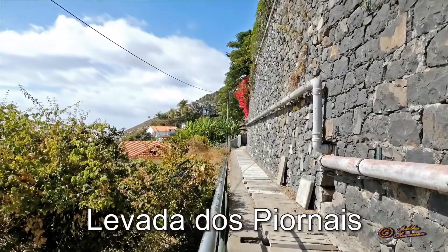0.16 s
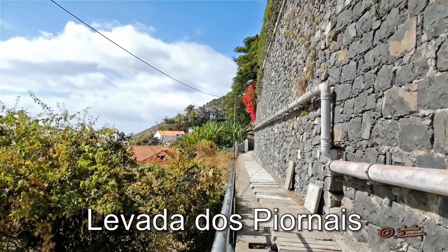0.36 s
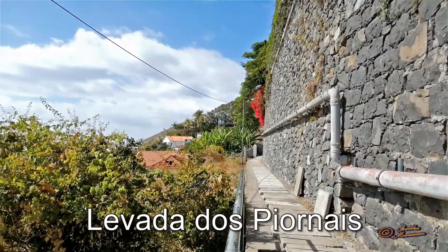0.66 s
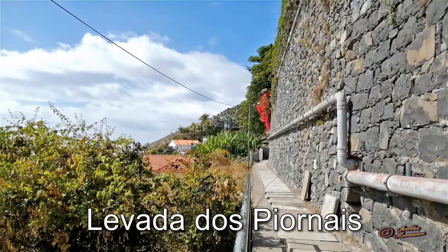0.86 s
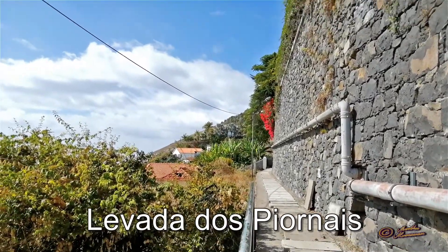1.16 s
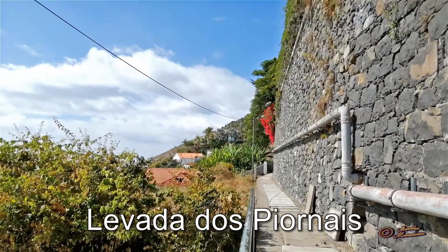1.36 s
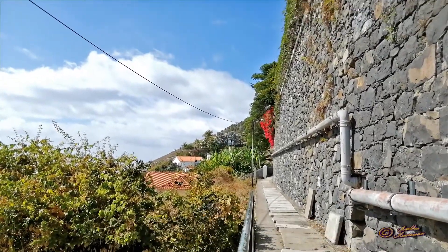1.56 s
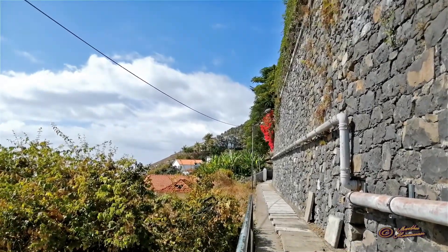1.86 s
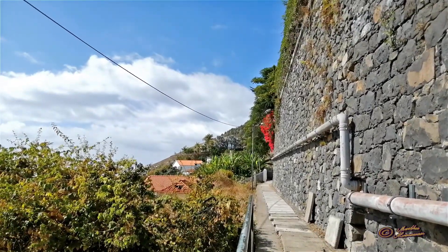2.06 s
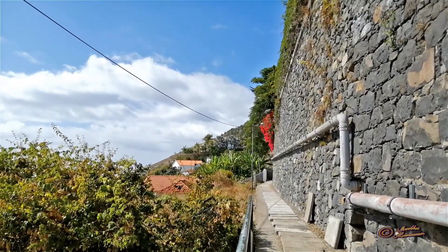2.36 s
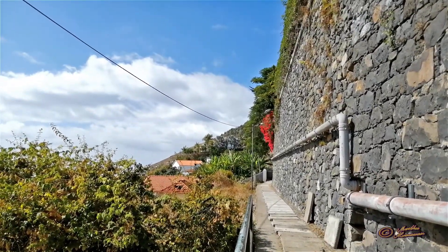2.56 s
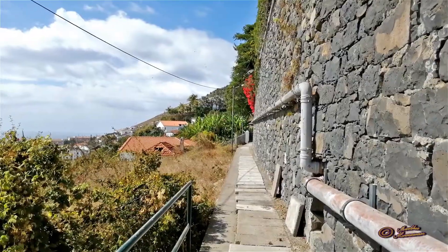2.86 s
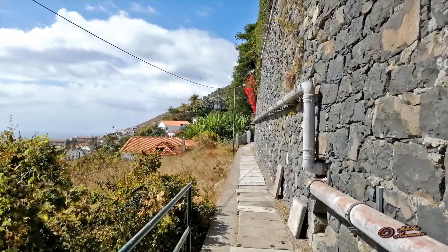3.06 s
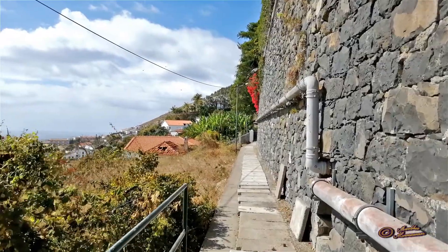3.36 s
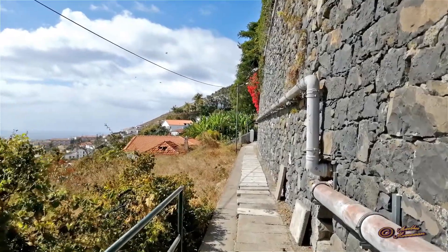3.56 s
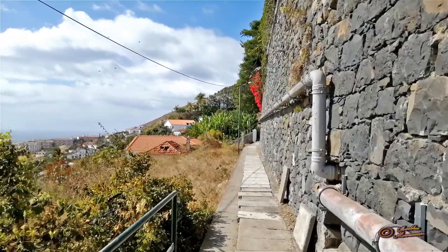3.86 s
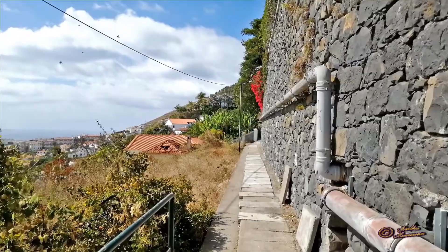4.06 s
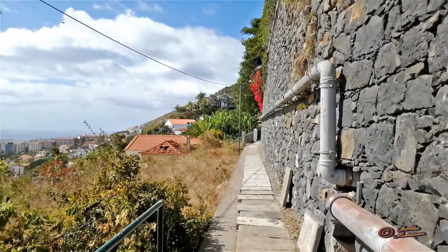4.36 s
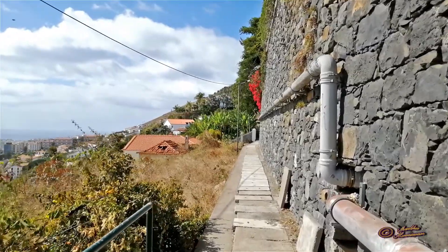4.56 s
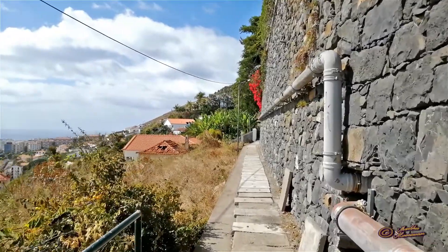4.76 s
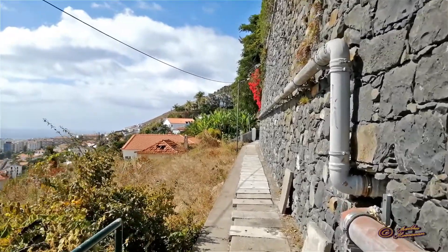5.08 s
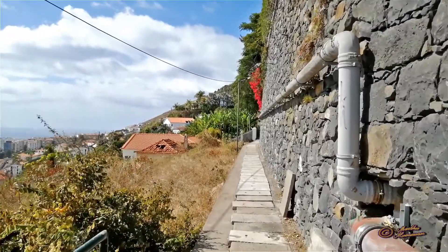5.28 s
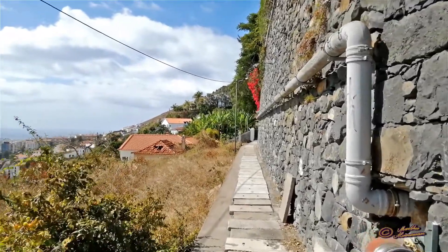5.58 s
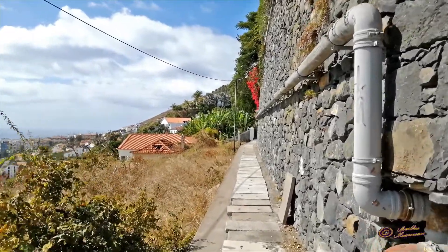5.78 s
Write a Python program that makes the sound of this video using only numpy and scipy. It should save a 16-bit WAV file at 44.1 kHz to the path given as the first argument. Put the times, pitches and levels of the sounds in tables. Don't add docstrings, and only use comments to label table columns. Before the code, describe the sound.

Water gurgles and bubbles along a narrow stone channel outdoors while gusty wind thuds and rumbles irregularly against a small handheld microphone.

```python
import sys
import numpy as np
from scipy import signal
from scipy.fft import rfft, irfft, next_fast_len
from scipy.io import wavfile
from scipy.ndimage import uniform_filter1d

SR = 44100
rng = np.random.default_rng(int(sys.argv[2]) if len(sys.argv) > 2 else 0)


def attenuation_scalar(level_db):
    decades = np.asarray(level_db, float) / 20
    return 10 ** decades


def wav_out(sig):
    wavfile.write(sys.argv[1], SR, np.round(np.clip(np.atleast_2d(sig).T, -1, 1) * 32767).astype(np.int16))


N = 261064

AIR_DB = -85.5
WASH_DB, WASH_PER_CHURN, WASH_PER_PUSH, WASH_PER_FACING = -54, 0.91, 0.62, 1
# (frequency [Hz], density [dB per Hz])
WASH_SPECTRUM = [(420, -15), (483, -27), (663, 0.5), (1030, -3.5), (1620, -15), (2340, -17.5), (4500, -37),
                 (5850, -56), (9900, -120)]
# (frequency [Hz], density [dB per Hz])
SPRAY_SPECTRUM = [(2500, -11), (3500, -4.5), (4800, -1), (6000, -9), (7000, -3.5), (8800, -6.5),
                  (10200, -45), (12000, -21.5), (15600, -22)]
# (frequency [Hz], level [dB])
FIZZ_SPECTRUM = [(500, 3.5), (1000, 1.5), (2500, 7), (4600, -1.5), (6000, -5), (8000, 0), (10000, -23)]
# (resonance [Hz], width [Hz], level [dB])
CHANNEL_MODES = [
    (880, 170, -14.5),
    (1500, 810, -4.5),
    (2470, 180, -14),
    (3250, 54, -19),
    (4820, 740, -4),
]

# (start [s], hold [s], level [dB], upper band over it [dB])
RUSH_SPELLS = [(0.0, 0.14, -53, -10), (.59, 0.16, -51, -11), (.86, 0.1, -53.5, -22), (1.02, 0.14, -48, -6),
               (1.35, 0.12, -49.5, -12), (2.12, 0.17, -52, -17), (2.42, 0.26, -59, 1.5),
               (2.99, 0.15, -53.5, -2.5), (3.2, .17, -55.5, -21), (3.5, 0.14, -63, -13),
               (4.06, 0.323, -51.5, -8), (4.57, 0.081, -58.5, -27), (4.97, 0.15, -53, -22),
               (5.15, .13, -59, -2), (5.44, 0.18, -57.5, -17)]
RUSH_RISE_DB_PER_S, RUSH_FALL_DB_PER_S = 348, 350

# (start [s], hold [s], push level [dB], thud over push [dB])
WIND_GUSTS = [(0.0, 0.061, -22.5, -4), (0.36, 0.05, -19.5, -36), (0.55, 0.089, -21.5, -18),
              (0.82, 0.17, -15.5, -23.5), (1.03, 0.072, -14, -18), (1.24, 0.025, -22, -20),
              (1.36, 0.095, -19, -10), (1.55, 0.23, -26.5, -20.5), (1.85, 0.16, -20.5, -7),
              (2.1, 0.11, -8, -15.5), (2.3, 0.11, -14.5, -12), (2.5, 0.15, -23, -7.5),
              (2.88, 0.15, -28, -12.5), (3.09, 0.015, -19.5, -28), (3.24, 0.01, -20, -4.5),
              (3.47, 0.019, -28.5, -33), (3.56, 0.17, -25, -10), (3.8, 0.0083, -18.5, -19.5),
              (3.92, 0.024, -25.5, -7), (4.05, 0.054, -12.5, -4), (4.18, 0.039, -2, -14.5),
              (4.27, 0.08, -24.5, -4), (4.57, 0.017, -23.5, -6.5), (4.68, 0.14, -33, -2),
              (4.96, 0.031, -21.5, -10.5), (5.1, 0.13, -24.5, -15.5), (5.38, 0.055, -23.5, -17),
              (5.55, 0.041, -24.5, -13.5), (5.72, 0.21, -39, -10)]
GUST_RISE_DB_PER_S, GUST_FALL_DB_PER_S, LULL_DB, LULL_THUD_DB = 203.5, 178, -38, -51.5
FLUTTER_DB, FLUTTER_PER_PUSH, FLUTTER_PER_THUD, FLUTTER_PER_CHURN = -45, 0.56, 0.094, 0.41
# (time [s], level [dB])
MIC_FACING = [(0.0, 8.5), (0.15, 8.5), (0.4, -1), (0.7, 1.5), (1.1, -1.5), (1.5, 0.5), (1.85, -4),
              (2.3, -2.5), (2.65, 5.5), (3.0, -6.5), (3.35, 10), (3.55, -7), (4.1, -3.5), (4.4, 1.5),
              (4.7, 4), (5.05, -7), (5.5, 2), (5.92, -3)]
# (time [s], peak [dB], pitch [Hz])
HOUSING_KNOCKS = [
    (1.899, -32, 154),
    (2.005, -20.5, 141),
    (3.243, -29.5, 160),
    (4.357, -16, 169.6),
    (4.564, -17, 158),
    (4.923, -22, 52.7),
]

# (start [s], hold [s], churn level [dB], spray over churn [dB])
STREAM_SURGES = [(0.0, 0.16, -52.5, -12), (.3, 0.05, -59, -37), (.38, 0.067, -50.5, -19.5),
                 (.6, 0.11, -53.5, -16), (.82, 0.16, -51, -14), (1.0, 0.15, -51, -11),
                 (1.28, 0.068, -54, -23), (1.36, 0.097, -50, -15.5), (1.53, 0.0097, -49, -17.5),
                 (1.64, 0.13, -56.5, -13), (1.83, 0.11, -46.5, -19.5), (1.97, 0.13, -53, -17),
                 (2.14, 0.11, -49, -11), (2.3, 0.23, -51, -13), (2.5, 0.24, -56, -12),
                 (2.91, 0.13, -51, -19), (3.08, 0.12, -52.5, -22), (3.2, 0.083, -63.5, -6.5),
                 (3.53, 0.04, -53, -16.5), (3.65, 0.15, -54.5, -24), (3.98, 0.26, -50, -17.5),
                 (4.14, 0.18, -51, -13), (4.34, 0.11, -50.5, -18), (4.6, 0.17, -54.5, -23.5),
                 (4.8, 0.12, -60, -19), (4.97, 0.14, -54, -24), (5.18, 0.12, -49, -20.5),
                 (5.4, 0.16, -58, -15), (5.56, 0.13, -57, -29), (5.7, 0.14, -59, -33)]
SURGE_RISE_DB_PER_S, SURGE_FALL_DB_PER_S, CALM_DB, CALM_SPRAY_DB = 265, 194, -64, -78
# (time [s], level [dB], centre [Hz])
WATER_SLAPS = [
    (1.281, -39, 880),
    (3.536, -53, 1610),
    (5.578, -48.5, 1250),
    (1.837, -49, 1820),
    (2.15, -48, 3230),
]
# (time [s], peak [dB])
FOAM_POPS = [(1.0814, -58), (1.393, -47), (1.842, -53), (1.877, -51), (2.242, -39), (2.422, -47),
             (2.632, -47), (3.484, -57), (3.5433, -51), (5.221, -50), (5.624, -47.5)]

# (time [s], peak [dB], pitch [Hz], life [cycles])
SLAB_GLUGS = [(0.038, -36, 925, 43), (0.082, -39, 562, 68), (0.331, -37.5, 1410, 29), (0.441, -33, 924, 26),
              (0.776, -42, 1500, 56), (1.002, -37, 625, 62), (1.087, -36.5, 1390, 38),
              (1.926, -42, 645, 41), (2.062, -43, 830, 78), (2.285, -42.5, 1030, 78),
              (2.365, -37.5, 2470, 68), (2.489, -24, 590, 13), (2.707, -22.5, 670, 8.7),
              (3.055, -40, 750, 66), (3.549, -33.5, 2270, 57), (3.736, -44, 1175, 97),
              (3.986, -39, 1290, 42), (4.08, -28.5, 2400, 22), (4.332, -25.5, 530, 14),
              (4.37, -54, 1600, 110), (4.555, -47.5, 730, 55), (4.56, -42.5, 2420, 81),
              (4.842, -39.5, 1450, 33), (5.001, -40, 1220, 28), (5.159, -44, 1370, 38),
              (5.346, -38, 2400, 14), (5.444, -45, 1500, 100), (5.476, -47, 740, 96), (5.86, -46, 1230, 33)]
# (time [s], peak [dB], pitch [Hz], life [cycles], pitch rise over life [fraction])
BIG_GULPS = [(0.286, -38.5, 800, 94, 0.3), (0.636, -40, 646, 96, 1), (0.664, -34.5, 762, 50, 0.22),
             (0.866, -29, 624, 115, 0.67), (0.982, -41, 774, 130, 0.18), (1.213, -44, 877, 120, 0.19),
             (1.289, -31.5, 933, 66, 0.15), (1.381, -37.5, 629, 135, 0.19), (1.451, -48.5, 576, 220, 0.22),
             (1.837, -48, 562, 110, 0.13), (2.009, -37, 893, 38, 0.16), (2.167, -34.5, 845, 41, 0.26),
             (2.256, -35, 940, 60, 0.078), (2.327, -40.5, 910, 64, 0.16), (2.53, -23.5, 790, 35, 0.49),
             (2.638, -33, 564, 115, 0.5), (2.899, -36, 854, 87, 0.174), (3.005, -39, 1130, 77, 0.067),
             (3.573, -35.5, 1230, 50, 0.078), (3.979, -33.5, 685, 95, 0.075), (4.424, -32, 698, 80, 0.1),
             (5.578, -36, 1124, 110, 0.22), (5.644, -37.5, 740, 36, 0.21), (5.695, -45.5, 683, 97, 0.089)]
# (time [s], peak [dB], pitch [Hz], life [cycles])
CLEAR_BUBBLES = [(0.0406, -35.5, 1415, 62), (0.0817, -34, 1560, 42), (0.131, -28, 2090, 31),
                 (0.201, -41, 1380, 64), (0.597, -37.5, 2194, 110), (0.6713, -31, 2860, 31),
                 (1.1079, -34.5, 2050, 68), (1.291, -44, 1400, 160), (1.4521, -31, 1660, 67),
                 (1.81, -37.5, 3010, 32), (1.818, -38.5, 3120, 46), (1.8794, -42, 1587, 140),
                 (1.945, -36, 1640, 26), (2.285, -29.5, 1590, 31), (2.446, -35.5, 2470, 61),
                 (2.5998, -31.5, 2430, 51), (2.635, -33.5, 1614, 62), (2.782, -31.5, 1670, 60),
                 (2.935, -38, 2430, 62), (2.989, -32, 2720, 37), (3.093, -33.5, 1285, 40),
                 (3.1876, -30, 2500, 22), (3.534, -41, 1860, 99), (3.7894, -42, 1680, 61),
                 (4.064, -38.5, 1320, 100), (4.192, -23, 1560, 28), (4.4278, -35, 1660, 59),
                 (4.635, -38.5, 1337, 61), (5.2025, -32, 2370, 35), (5.232, -26, 2120, 8.2),
                 (5.446, -32, 2320, 61)]
# (time [s], peak [dB], pitch [Hz])
HIGH_DROPLETS = [(0.39, -45.5, 3540), (0.835, -43.5, 3570), (1.083, -44.5, 4080), (1.261, -38.5, 3710),
                 (1.3875, -44, 6700), (1.4058, -44.5, 4600), (1.522, -33.5, 6900), (1.538, -42.5, 3740),
                 (1.693, -42, 4740), (1.838, -38, 4530), (2.0063, -43, 5500), (2.15, -32.5, 3840),
                 (2.1907, -33.5, 3300), (2.241, -38, 3470), (2.423, -32.5, 3190), (2.4688, -37.5, 3750),
                 (2.6346, -41, 3470), (2.9099, -33.5, 6030), (2.9472, -43, 6640), (2.988, -42, 4040),
                 (3.2178, -33.5, 3360), (3.4918, -43, 3100), (3.5468, -44, 7000), (4.2088, -37.5, 4540),
                 (4.7705, -42.5, 4700), (5.1448, -47, 5900), (5.204, -46, 4100), (5.3235, -41.5, 8100),
                 (5.3913, -41, 4200)]
# (time [s], peak [dB], pitch [Hz])
DEEP_BLIPS = [(0.4064, -43.5, 980), (0.407, -44, 1590), (0.4446, -45.5, 1414), (0.594, -44, 1485),
              (0.8323, -47, 1790), (0.914, -41, 1290), (0.9489, -44, 1400), (1.0388, -41, 1460),
              (1.3933, -46, 946), (1.513, -45.5, 1500), (1.6904, -49, 1280), (1.9401, -39.5, 927),
              (1.9932, -42, 1310), (2.1251, -43, 1050), (2.1657, -40.5, 1330), (2.2063, -34, 1750),
              (2.427, -42.5, 1420), (2.6461, -43.4, 867), (3.534, -42.5, 1330), (3.5604, -40, 1820),
              (4.1504, -38, 850), (4.1866, -37.5, 840), (4.2102, -47, 1910), (4.2316, -41, 1210),
              (4.2381, -40, 896), (4.728, -47.5, 1390), (4.9122, -46.5, 1840), (4.971, -44.5, 1630),
              (5.082, -46, 820), (5.2015, -47, 1260), (5.2692, -43, 1395), (5.6787, -45, 1740)]
# (time [s], peak [dB], pitch [Hz])
MIDDLE_PLINKS = [(0.0198, -39.5, 1950), (0.0384, -39.5, 2870), (0.108, -43, 2570), (0.121, -43, 3380),
                 (0.338, -43.5, 2970), (0.6751, -42, 3460), (0.805, -51, 3600), (0.8815, -39, 2600),
                 (0.9733, -42, 3423), (1.3303, -47, 3640), (1.406, -45, 4100), (1.45, -40.5, 2800),
                 (1.5203, -42.5, 3130), (1.5625, -46, 1990), (1.8781, -41, 2088), (1.886, -42, 3700),
                 (1.9461, -41, 2600), (2.1616, -32, 3014), (2.176, -35, 2550), (2.1992, -37, 1920),
                 (2.2096, -32, 2480), (2.239, -39, 4100), (2.2431, -33.5, 3370), (2.3418, -51, 1950),
                 (2.4463, -45.5, 3854), (2.605, -40, 3000), (2.645, -44, 3170), (2.68, -46, 4328),
                 (2.7647, -48, 3200), (2.898, -47, 4005), (2.9448, -44, 4370), (3.2039, -42.5, 2130),
                 (3.2467, -43, 2433), (3.4742, -46.5, 2928), (3.5466, -41, 1880), (4.2063, -49, 4200),
                 (4.2086, -35.5, 1930), (4.324, -41, 3100), (4.3692, -41.5, 2250), (4.628, -47.5, 3980),
                 (4.645, -42.5, 2920), (5.002, -43, 2400), (5.04, -44, 2370), (5.2378, -38, 2250),
                 (5.3432, -45, 3050), (5.3481, -47, 2150), (5.4166, -44, 4134), (5.5694, -47, 4134),
                 (5.5861, -50, 3143), (5.8014, -51, 3780), (5.902, -48.5, 3260)]
# (time [s], peak [dB], pitch [Hz])
STRAY_BUBBLES = [
    (1.386, -39, 626),
    (2.086, -37.5, 978),
    (3.208, -44, 4200),
    (4.191, -40, 2270),
    (4.375, -39, 2530),
    (4.375, -43.5, 1630),
]
# (time [s], peak [dB], pitch [Hz])
TINY_TICKS = [(0.0978, -49, 5017), (0.1022, -47, 8871), (0.1025, -45, 8333), (0.1385, -48, 6600),
              (0.97, -42, 8100), (1.0818, -47, 5200), (1.4323, -46, 8200), (1.5203, -46, 4570),
              (1.8364, -45, 6700), (1.8376, -39, 8250), (1.8771, -40, 8200), (2.1673, -37.5, 4909),
              (2.1996, -37, 7600), (2.24, -40, 5254), (2.2399, -35.5, 8240), (2.3074, -41.5, 5260),
              (2.423, -43, 4931), (2.438, -40, 4600), (2.512, -46, 7558), (2.5737, -47, 8360),
              (2.6317, -48, 9800), (2.9452, -46, 8000), (3.047, -49, 7000), (3.2166, -47, 4930),
              (3.231, -43, 4920), (3.5431, -50, 8240), (4.4076, -45, 8548), (4.4487, -49, 7150),
              (4.81, -51, 4930), (4.9777, -49, 7250), (5.003, -51, 7665), (5.1036, -48, 7260),
              (5.22, -49, 8350), (5.2814, -46, 4500), (5.58, -52, 8914), (5.6124, -51, 8100),
              (0.7751, -55, 6600), (0.8574, -65, 4600), (0.913, -47, 7460), (1.012, -53, 4730),
                 (1.1568, -46.5, 4700), (4.55, -64, 7210), (4.6119, -54, 7090), (4.6857, -55, 7300),
                 (4.8554, -53, 4770), (5.482, -53, 4600), (5.7244, -54, 8500)]


def at_hz(points, hz):
    points_hz, points_db = np.transpose(points)
    return np.interp(np.log(hz), np.log(points_hz), points_db)


def rms_one(x):
    return x / np.sqrt(np.mean(x ** 2) + 1e-20)


def drift(rate_hz):
    r = np.exp(-80 * np.pi * rate_hz / SR)
    slow = signal.lfilter([1], [1, -2 * r, r * r], rng.standard_normal(N // 40 + 2002))[2000:]
    return np.interp(np.arange(N) / 40, np.arange(len(slow)), rms_one(slow))


def bandpass(x, order, low_hz, high_hz):
    return signal.sosfilt(signal.butter(order, [low_hz, high_hz], "band", fs=SR, output="sos"), x)


def lowpass(x, order, cutoff_hz):
    return signal.sosfilt(signal.butter(order, cutoff_hz, fs=SR, output="sos"), x)


def puffs(impulses, die_s):
    envelope = signal.lfilter([1], [1, -attenuation_scalar(-60 / (die_s * SR))], impulses + 1e-18)
    return envelope * rng.standard_normal(N)


def sloped_noise(low_hz, high_hz, slope_db, even_s):
    size = next_fast_len(N)
    hz = np.maximum(np.fft.rfftfreq(size, 1 / SR), .1)
    edges = np.sqrt((1 + (low_hz / hz) ** 8) * (1 + (hz / high_hz) ** 6))
    shape = attenuation_scalar(slope_db * np.log2(hz / low_hz)) / edges
    x = irfft(rfft(rng.standard_normal(N), size) * shape, size)[:N]
    width = int(even_s * SR)
    power = uniform_filter1d(uniform_filter1d(x ** 2, width), width)
    return rms_one(x / np.sqrt(power + 1e-20))


def banded_noise(spectrum, patchy_db, shared_db, flicker_hz=21):
    out, together = 0, drift(30)
    edges_hz = 300 * 2 ** (np.arange(18) / 3)
    white = rng.standard_normal((2, N))
    for k, (low_hz, high_hz) in enumerate(zip(edges_hz, edges_hz[1:])):
        band = bandpass(white[k % 2], 2, low_hz, high_hz)
        level_db = at_hz(spectrum, np.sqrt(low_hz * high_hz))
        out = out + band * attenuation_scalar(level_db + shared_db * together + patchy_db * drift(flicker_hz))
    return rms_one(out)


def swells(rows, rise_db_per_s, fall_db_per_s, floors_db):
    start, hold, main_db, over_db = (column[:, None] for column in np.transpose(rows))
    t = np.arange(0, N + 64, 64) / SR
    shape_db = -rise_db_per_s * np.maximum(start - t, 0) - fall_db_per_s * np.maximum(t - start - hold, 0)
    levels = []
    for peak_db, floor_db in zip((main_db, main_db + over_db), floors_db):
        power = attenuation_scalar(2 * floor_db) + attenuation_scalar(2 * (shape_db + peak_db)).sum(axis=0)
        levels.append(np.interp(np.arange(N) / SR, t, 10 * np.log10(power)))
    return levels


def add_bubble(out, s, peak_db, hz, cycles, rise, snap, swell, late=0):
    life = max(cycles, 2) / hz
    start = max(int(s * SR), 0)
    t = np.arange(min(int(life * SR) + 2, N - start)) / SR
    climb = rise * t ** 2 / life * (1 - late + late * 2 * t / life)
    tone = np.sin(2 * np.pi * hz * (t + climb))
    ringing = attenuation_scalar(-60 * t / life) * (1 - np.exp(-t * hz / swell)) * (1 - t / life) ** 2
    out[start:start + len(t)] += attenuation_scalar(peak_db) * (ringing + snap * attenuation_scalar(-30 * t * hz)) * tone


def channel(x):
    out = x.copy()
    for hz, width_hz, db in CHANNEL_MODES:
        r = np.exp(-np.pi * width_hz / SR)
        poles = [1, -2 * r * np.cos(2 * np.pi * hz / SR), r * r]
        out += attenuation_scalar(db) * signal.lfilter([(1 - r * r) / 2, 0, (r * r - 1) / 2], poles, x)
    return out


def wall(x, wet_db):
    t = np.arange(int(.06 * SR)) / SR
    rough = signal.lfilter([.6], [1, -.4], rng.standard_normal(len(t)))
    echoes = rough * attenuation_scalar(-60 * t / 0.073) * (t > .002)
    n = np.arange(N)
    delay = .002 * SR * (1 + np.sin(2 * np.pi * .9 * n / SR))
    swayed = np.interp(n - delay, n, x)
    return x + attenuation_scalar(wet_db) * signal.fftconvolve(swayed, echoes / np.sqrt(np.sum(echoes ** 2)))[:N]


def still_air():
    return channel(attenuation_scalar(AIR_DB) * sloped_noise(1200, 15000, -0.44, even_s=.5))


def far_wash(push_db, churn_db, facing_db):
    level_db = WASH_DB + WASH_PER_CHURN * (churn_db + 55) + WASH_PER_PUSH * (push_db + 23.5)
    level_db = level_db + WASH_PER_FACING * facing_db
    return channel(attenuation_scalar(level_db - 10.5) * banded_noise(WASH_SPECTRUM, patchy_db=3.0, shared_db=2.0))


def rush():
    low_db, upper_db = swells(RUSH_SPELLS, RUSH_RISE_DB_PER_S, RUSH_FALL_DB_PER_S, (-67, -75))
    low = lowpass(sloped_noise(377, 396, 0.88, even_s=0.16), 8, 445)
    return attenuation_scalar(low_db) * low + attenuation_scalar(upper_db) * sloped_noise(520, 410, -12.0, even_s=0.074)


def wind(push_db, thud_db, churn_db, facing_db):
    flutter_db = (FLUTTER_DB + FLUTTER_PER_PUSH * (push_db + 22.5) + FLUTTER_PER_THUD * (thud_db + 40.5)
                  + FLUTTER_PER_CHURN * (churn_db + 51.0) + facing_db)
    lumps = drift(16)
    push = attenuation_scalar(push_db - 5.0) * sloped_noise(5.7, 17.5, -6.5, even_s=0.11)
    thud = attenuation_scalar(thud_db - 2.0 + 2.27 * lumps) * sloped_noise(29.5, 125.5, -10.0, even_s=0.16)
    flutter_db = flutter_db - 2.5 + 1.27 * lumps + 0.64 * drift(29)
    flutter = attenuation_scalar(flutter_db) * sloped_noise(129.0, 302, -6.5, even_s=0.067)
    t = np.arange(N) / SR
    pressed = -.15 * np.exp(-(t / .04) ** 2)
    settle = 1 - np.exp(-t / .02)
    return settle * (push + thud + flutter) + pressed


def knocks():
    out = np.zeros(N)
    for s, db, hz in HOUSING_KNOCKS:
        add_bubble(out, s, db + .1, hz, cycles=16.3, rise=0.094, snap=0.012, swell=1.0)
    return out


def spray(spray_db, push_db):
    bands = banded_noise(SPRAY_SPECTRUM, patchy_db=5.5, shared_db=3.0, flicker_hz=2.8)
    drops = channel(attenuation_scalar(spray_db - 2.5 + 0.24 * (push_db + 22)) * bands)
    sheen = attenuation_scalar(1.6 * (spray_db + 65) - 82) * sloped_noise(10500, 15000, -8.0, even_s=.5)
    return drops + sheen


def crackle(per_s, spread_db, die_s):
    sizes = attenuation_scalar(spread_db * np.minimum(rng.exponential(1, N), 3))
    bursts = sizes * (rng.random(N) < per_s / SR)
    return rms_one(bandpass(puffs(bursts, die_s), 3, 6000, 9400))


def pops(die_s, low_hz):
    s, db = np.transpose(FOAM_POPS)
    clicks = np.zeros(N)
    clicks[(s * SR).astype(int)] = attenuation_scalar(db)
    return bandpass(puffs(clicks, die_s), 2, low_hz, 12500)


def splashes(die_s, spread):
    out, white = np.zeros(N), rng.standard_normal(N)
    t = np.arange(N) / SR
    for s, db, hz in WATER_SLAPS:
        cloud = rms_one(bandpass(white, 2, hz / spread, hz * spread))
        onset = np.clip((t - s) / .004, 0, 1)
        out += attenuation_scalar(db - 60 * np.clip((t - s) / die_s, 0, 2) ** 2) * onset * cloud
    return out


def fizz(count, spread_db, cycles):
    out = np.zeros(N)
    late, pitch, size, length = rng.random((count, 4)).T
    flocks_s = np.repeat(rng.random(count // 6), 6) * N / SR
    births_s = np.minimum(flocks_s - .03 * np.log(late + 1e-3), N / SR - .001)
    pitches_hz = 520 * 19 ** pitch
    rises = .24 * length - .04
    sizes_db = at_hz(FIZZ_SPECTRUM, pitches_hz) - spread_db * np.log(size + 0.12)
    for s, db, hz, long, rise in zip(births_s, sizes_db, pitches_hz, length, rises):
        add_bubble(out, s, db, hz, cycles * (0.57 + long), rise, snap=0.086, swell=0.39)
    return rms_one(out)


def gurgle():
    out = np.zeros(N)
    for s, db, hz, cycles in SLAB_GLUGS:
        add_bubble(out, s, db, hz, cycles, rise=0.084, snap=0.044, swell=0.83)
    for s, db, hz, cycles, rise in BIG_GULPS:
        add_bubble(out, s, db + 0.13, hz, cycles, rise, snap=.05, swell=1.7, late=0.79)
    for s, db, hz, cycles in CLEAR_BUBBLES:
        add_bubble(out, s, db, hz, cycles, rise=0.053, snap=0.04, swell=0.92)
    for s, db, hz in HIGH_DROPLETS:
        add_bubble(out, s, db + .1, hz, cycles=60, rise=0.055, snap=0.03, swell=0.3)
    for s, db, hz in DEEP_BLIPS:
        add_bubble(out, s, db + .1, hz, cycles=92, rise=0.15, snap=.03, swell=0.93)
    for s, db, hz in MIDDLE_PLINKS:
        add_bubble(out, s, db + 0.074, hz, cycles=62, rise=0.068, snap=.03, swell=0.85)
    for s, db, hz in STRAY_BUBBLES:
        add_bubble(out, s, db + .1, hz, cycles=70, rise=0.035, snap=0.031, swell=1.6)
    for s, db, hz in TINY_TICKS:
        add_bubble(out, s, db + .1, hz, cycles=72, rise=0.057, snap=.03, swell=0.69)
    return out


def scene():
    push_db, thud_db = swells(WIND_GUSTS, GUST_RISE_DB_PER_S, GUST_FALL_DB_PER_S, (LULL_DB, LULL_THUD_DB))
    churn_db, spray_db = swells(STREAM_SURGES, SURGE_RISE_DB_PER_S, SURGE_FALL_DB_PER_S,
                                (CALM_DB, CALM_SPRAY_DB))
    facing_db = np.interp(np.arange(N) / SR, *np.transpose(MIC_FACING))

    background = still_air() + far_wash(push_db, churn_db, facing_db) + rush()
    gusts = wind(push_db, thud_db, churn_db, facing_db) + knocks()
    foam = attenuation_scalar(spray_db - 9.0) * crackle(per_s=400, spread_db=3.0, die_s=0.0095)
    foam = foam + pops(die_s=0.006, low_hz=5630)
    surface = spray(spray_db, push_db) + foam + splashes(die_s=0.055, spread=1.41)
    small = channel(attenuation_scalar(churn_db - 7.0) * fizz(count=5400, spread_db=2.3, cycles=60))
    near = wall(gurgle() + small, wet_db=-11.0)
    near = lowpass(near, 4, 10000)
    return (background + gusts + surface + near)[None, :]


def low_pass(x):
    return signal.sosfilt(signal.butter(12, 15710, fs=SR, output="sos"), x)


def record(dry):
    b, a = signal.iirnotch(500, 4.0, fs=SR)
    dipped = .6 * dry + .4 * signal.lfilter(b, a, dry)
    limited = .8 * np.tanh(dipped / .8)
    return low_pass(limited)


dry = scene()
out = record(dry)
wav_out(out)
```